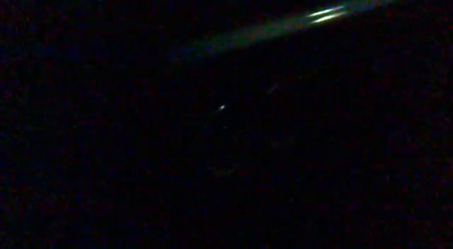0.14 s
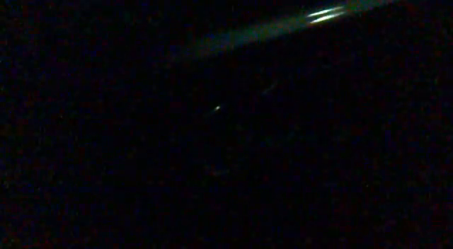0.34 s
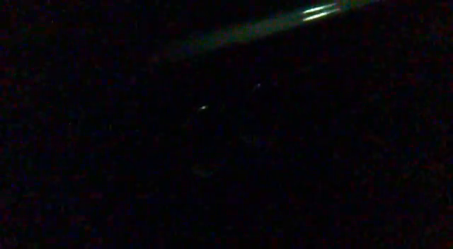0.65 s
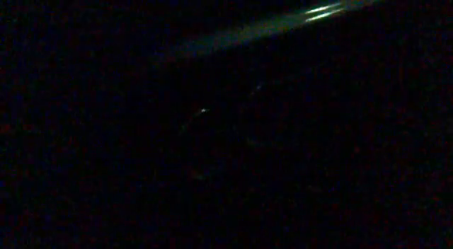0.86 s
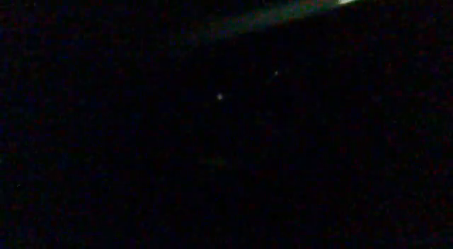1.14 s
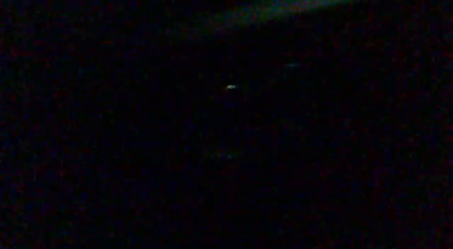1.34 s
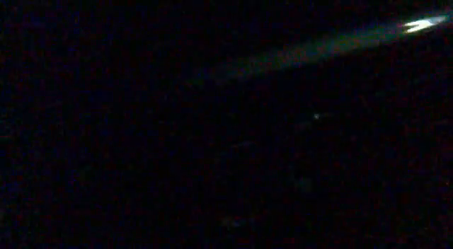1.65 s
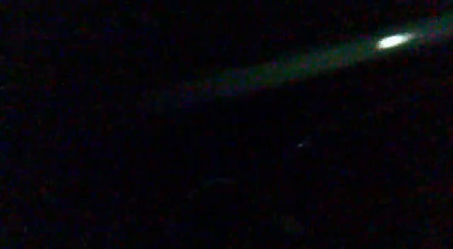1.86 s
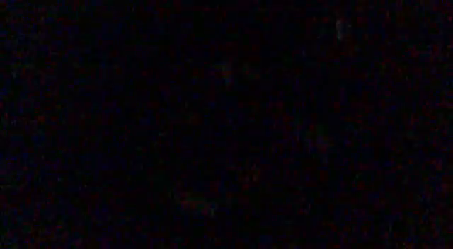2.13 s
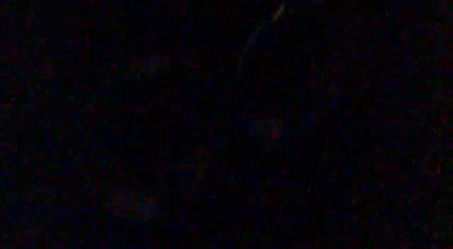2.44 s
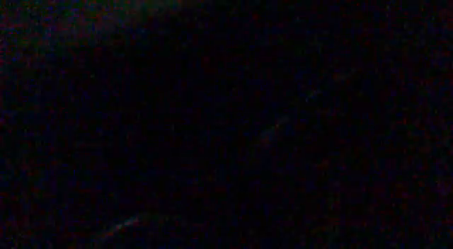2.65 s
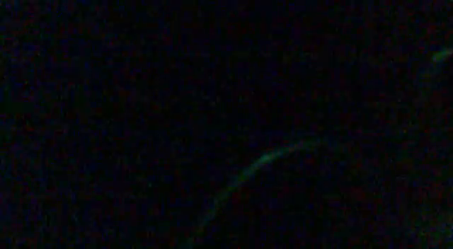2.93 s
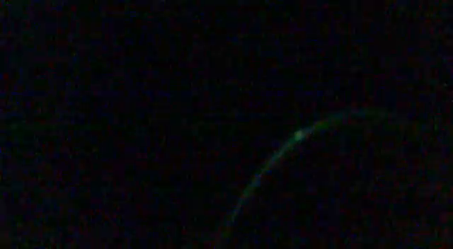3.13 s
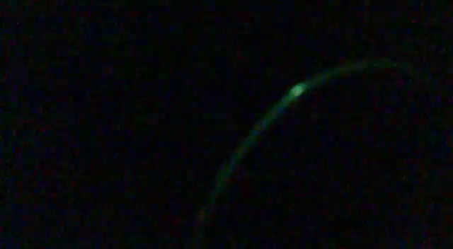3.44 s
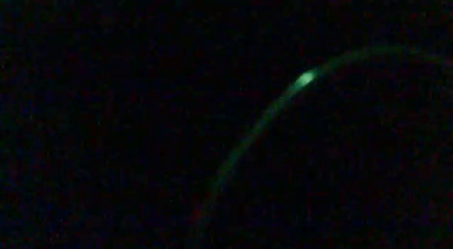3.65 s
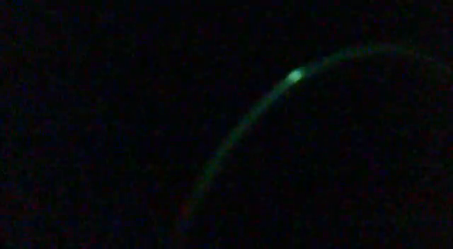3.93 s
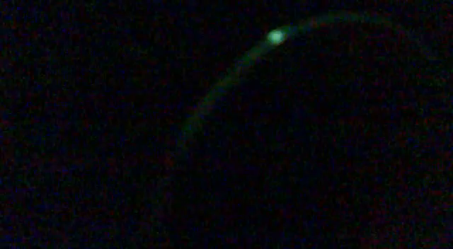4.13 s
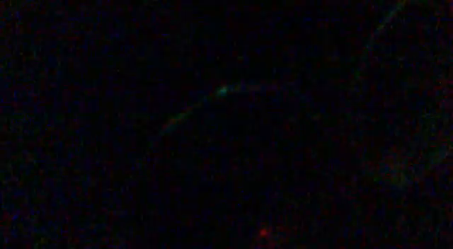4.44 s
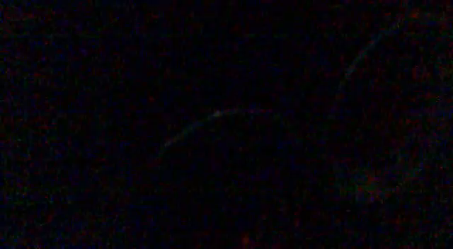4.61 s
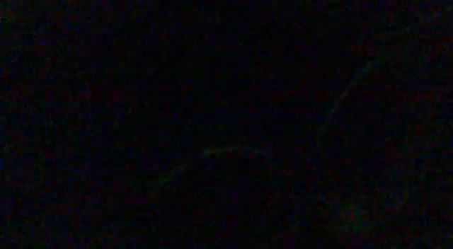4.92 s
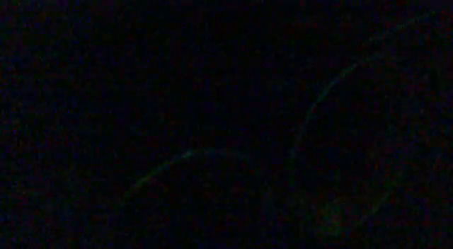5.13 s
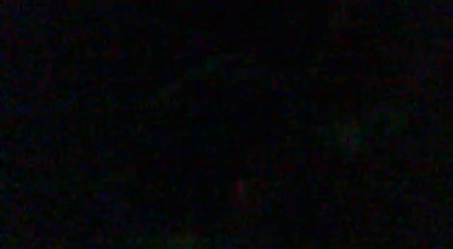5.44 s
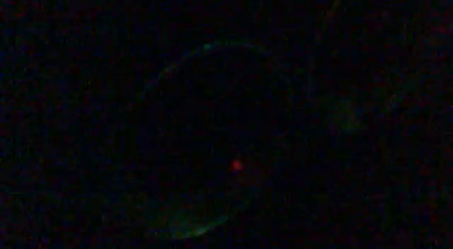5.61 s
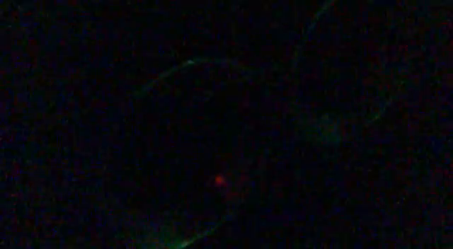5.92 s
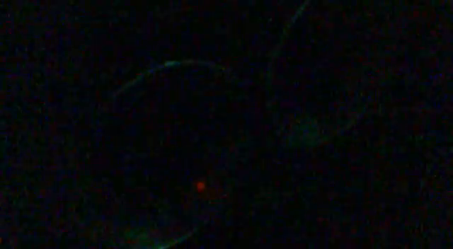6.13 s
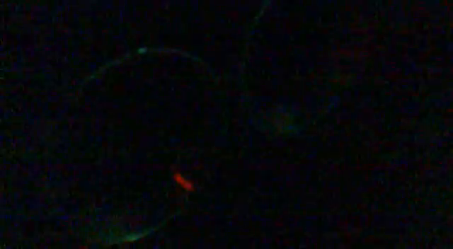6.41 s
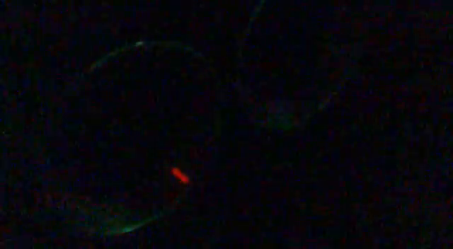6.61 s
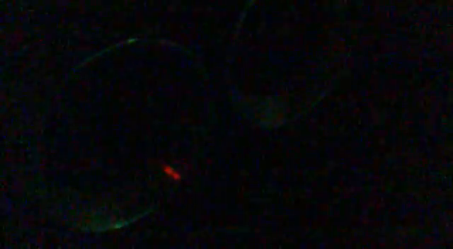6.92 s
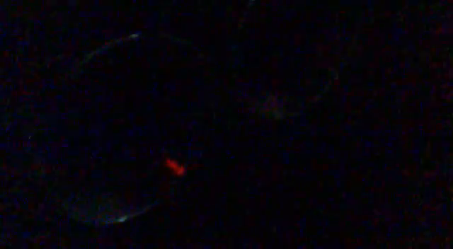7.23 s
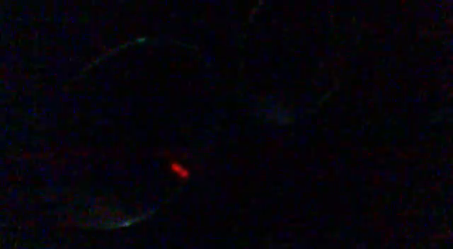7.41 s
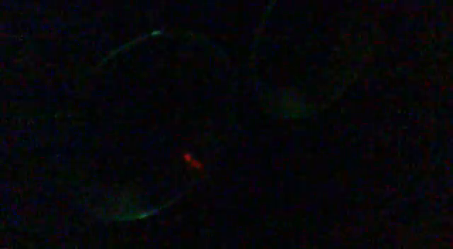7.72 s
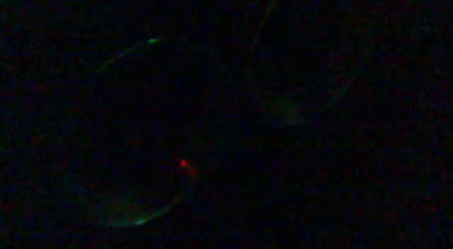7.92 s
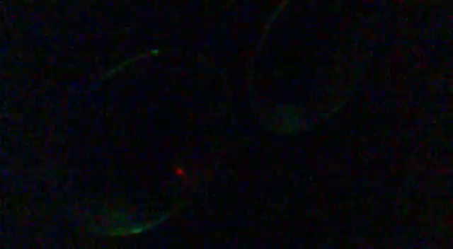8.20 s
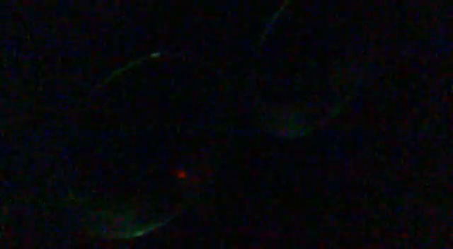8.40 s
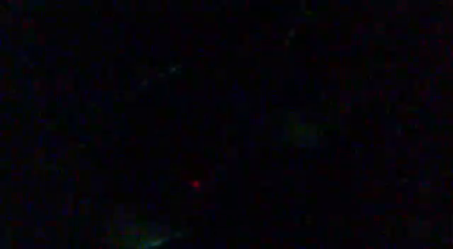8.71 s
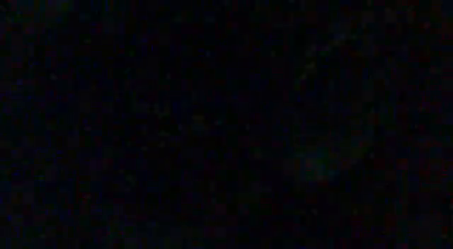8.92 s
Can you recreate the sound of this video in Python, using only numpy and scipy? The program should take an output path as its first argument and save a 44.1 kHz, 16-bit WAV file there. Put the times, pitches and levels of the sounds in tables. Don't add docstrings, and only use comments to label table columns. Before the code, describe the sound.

Low, throbbing exhaust idle heard up close outdoors, with airy hiss and a few sharp handling clicks, growing boomy and hollow before settling slower and quieter.

```python
import sys
import numpy as np
from scipy import signal
from scipy.fft import rfft, irfft
from scipy.io import wavfile
from scipy.ndimage import uniform_filter1d

SR = 44100
rng = np.random.default_rng(int(sys.argv[2]) if len(sys.argv) > 2 else 0)


def natural_amplitude(level_db):
    exponent = np.asarray(level_db, float) / 20
    return 10 ** exponent


def unload_audio(sound):
    columns = np.transpose(np.atleast_2d(sound))
    steps = np.round(np.clip(columns, -1, 1) * 32767)
    wavfile.write(sys.argv[1], SR, steps.astype(np.int16))


N = 399534


def rms_one(x):
    return x / np.sqrt(np.mean(x ** 2) + 1e-20)


def in_time(rows):
    s, *columns = np.transpose(rows)
    return [np.interp(np.arange(N) / SR, s, c) for c in columns]


def window(start_s, end_s, fade_s):
    t = np.arange(N) / SR
    return np.clip(np.minimum(t - start_s, end_s - t) / fade_s + .5, 0, 1)


def drift(rate):
    r = np.exp(-80 * np.pi * rate / SR)
    slow = signal.lfilter([1], [1, -2 * r, r * r], rng.standard_normal(N // 40 + 2002))[2000:]
    return np.interp(np.arange(N) / 40, np.arange(len(slow)), rms_one(slow))


def resonance(x, hz, width_hz):
    r = np.exp(-np.pi * width_hz / SR)
    feedback = [1, -2 * r * np.cos(2 * np.pi * hz / SR), r * r]
    return signal.lfilter(np.array([1, 0, -1]) * (1 - r * r) / 2, feedback, x)


def double_resonance(x, hz, width_hz):
    return resonance(resonance(x, hz, width_hz), hz, width_hz)


def tone(turns, db):
    return np.sqrt(2) * natural_amplitude(db) * np.cos(2 * np.pi * turns)


def noise(spectrum, patchy_db, beat_db=0):
    hz, db = np.transpose(spectrum)
    grid = np.maximum(np.arange(N // 2 + 1) * SR / N, 1)
    shape_db = np.interp(np.log(grid), np.log(hz), db, left=-90, right=-90)
    shaped = rfft(rng.standard_normal(N)) * natural_amplitude(shape_db)
    band = np.floor(2 * np.log2(grid / hz[0])).clip(0, int(2 * np.log2(hz[-1] / hz[0])))
    together = drift(3.6)
    out = np.zeros(N)
    for k in np.unique(band):
        flicker_db = patchy_db * (0.73 * together + drift(11)) + beat_db
        out += irfft(shaped * (band == k), N) * natural_amplitude(flicker_db)
    return rms_one(out)


def skirt_db(hz, peak_hz, width_hz):
    return -10 * np.log10(1 + ((hz - peak_hz) / width_hz) ** 2)


# time in seconds, firing rate in firings per second.
FIRING_RATE = [(0.0, 53.1), (0.2, 53.66), (0.6, 52.34), (1.0, 50.24), (1.4, 47.56), (1.8, 46.78),
               (2.4, 46.81), (3.0, 45.75), (4.4, 43.98), (4.6, 44.41), (5.0, 43.21), (5.2, 43.73),
               (5.4, 42.7), (6.0, 41.98), (7.6, 39.62), (9.06, 38.26)]
# time in seconds, firing tone (nearness) in dB,
# pipe ring (facing the mouth) in dB.
MIC_PATH = [(0, -24.5, -58), (.3, -21, -57), (.85, -19, -60), (1.3, -19, -58), (1.8, -18.5, -59),
            (2.1, -18, -42), (2.4, -14.5, -37), (2.8, -15, -35.5), (3.3, -10.5, -30.5), (4.0, -11, -31),
            (4.4, -12.5, -33), (5.0, -17.5, -40), (5.8, -17.5, -41), (6.4, -20, -42.5), (7.4, -20.5, -40),
            (8.4, -21, -43), (9.06, -22, -44)]


def firing_orders(turns, speed, first_db):
    second_db = first_db - 14.5 + skirt_db(2 * speed, 81.4, 5.1) + 1.6 * drift(1.1)
    fourth_db = first_db - 24.5 + skirt_db(4 * speed, 191.7, 11) + 1.1 * drift(2.4)
    load_db = 0.42 * drift(7.7)
    out = tone(turns, first_db + load_db)
    out += tone(2 * turns + .28, second_db) + tone(4 * turns - .42, fourth_db)
    out += tone(turns / 2 + .33, first_db - 36) + tone(1.5 * turns - .36, first_db - 36)
    out += tone(5.5 * turns, fourth_db - 9.5) + tone(6 * turns + .1, second_db - 15)
    out += tone(3 * turns, first_db - 34.5) + tone(5 * turns, fourth_db - 13)
    return out


# blow strength in dB, arrival against the firing tone in ms.
CYLINDERS = [(-4.9, -9.83), (-4.4, -12.0), (-3.1, -7.23), (-4.3, -8.18), (0.0, -7.28), (-1.0, -8.08)]


def exhaust_blows(turns):
    count = int(turns[-1])
    blow_db, lag_ms = np.array(CYLINDERS)[np.arange(count) % 6].T
    scatter = rng.standard_normal((count, 2))
    late_ms = lag_ms + .04 * scatter[:, 0]
    at = np.interp(np.arange(count), turns, np.arange(N)) + late_ms * SR / 1000
    blows = np.zeros(N)
    blows[np.clip(at.astype(int), 0, N - 1)] = natural_amplitude(blow_db + .7 * scatter[:, 1])
    return blows


# frequency in Hz, width in Hz, level in dB against a point 18.5 dB
SILENCER = [(28, 14, -42.5), (70, 30, -34), (135, 23, -32.5), (248.7, 17, -28), (340, 36, -32.5),
            (526, 110, -26.5)]


def engine():
    first_db, ring_db = in_time(MIC_PATH)
    speed, = in_time(FIRING_RATE)
    turns = np.cumsum(speed) / SR - .12
    orders = firing_orders(turns, speed, first_db)
    blows = exhaust_blows(turns)
    ring = double_resonance(blows, 302, 29)
    evened = ring / np.sqrt(uniform_filter1d(ring ** 2, size=SR // 3) + 1e-20)
    silencer = sum(natural_amplitude(db) * rms_one(double_resonance(blows, hz, w)) for hz, w, db in SILENCER)
    return orders + natural_amplitude(ring_db) * evened + natural_amplitude(first_db - 18.5) * silencer, turns


# time in seconds, openness in dB.
OPENNESS = [(0, 3.5), (.7, 4), (1.3, 2), (2.2, 0.5), (3.5, 0), (4.9, -4), (5.45, -2), (5.65, 1),
            (6.4, -1.5), (7.8, 0.5), (9.06, 0)]
# frequency in Hz, density in dB per Hz.
RUMBLE = [(20, -2.5), (35, -5.5), (60, -1.5), (110, -3.5), (160, -4), (230, -9), (330, -7.5), (400, -48.5),
          (520, -14.5)]
# frequency in Hz, density in dB per Hz.
RUSH = [(240, -31), (400, -1), (452, -0.5), (541, -2.5), (948, -4.5), (1080, -5), (1360, -7), (1460, -5.5),
        (1550, -6), (2800, -19.5), (3640, -27.5), (6160, -120)]
# frequency in Hz, density in dB per Hz.
SIZZLE = [(1350, -16), (2300, -1.5), (3830, -6.5), (4240, -8), (4890, -11), (9500, -22), (12400, -40),
          (20900, -120)]


def air(turns):
    open_db, = in_time(OPENNESS)
    beat = np.cos(2 * np.pi * turns)
    out = natural_amplitude(-39.5 + .3 * open_db) * noise(RUMBLE, patchy_db=0.1)
    out += natural_amplitude(-46.5 + .7 * open_db) * noise(RUSH, patchy_db=1.0, beat_db=0.34 * beat)
    out += natural_amplitude(-53.5 + open_db) * noise(SIZZLE, patchy_db=0.84, beat_db=0.63 * beat)
    return out


def engine_bay():
    level_db, until_s = -59.5, 1.55
    low = rms_one(double_resonance(rng.standard_normal(N), 7400, 1500))
    high = rms_one(double_resonance(rng.standard_normal(N), 10300, 3000))
    out = natural_amplitude(level_db - 1.5) * low * window(-1, until_s, 0.53)
    return out + natural_amplitude(level_db - 6) * high * window(-1, until_s, 0.46)


# frequency in Hz, width in Hz, level in dB,
# start in seconds, end in seconds.
DUCTS = [(535.4, 7, -47.5, -1, .82), (539, 56, -48.5, 3.0, 4.5), (545, 36, -53.5, 4, 10),
         (421, 13, -54, 0.9, 9), (856, 7.5, -55, 2.5, 3.1), (1117, 22, -56.5, 2, 3.4),
         (730, 13, -59, 4.5, 10), (1079.5, 15, -57, 5, 10), (1233, 15, -57, 6.5, 10),
         (1448, 60, -55.5, -1.5, 2.55), (1456, 9, -56, 2, 4.92), (1240, 180, -52, 0, 2.1),
         (784, 7.8, -57.5, 4.5, 5.65), (3430, 90, -61.5, -1, 1.34)]


def ducts():
    out = np.zeros(N)
    for hz, width_hz, db, start_s, end_s in DUCTS:
        singing = rms_one(resonance(rng.standard_normal(N), hz, width_hz))
        out += natural_amplitude(db + drift(1.6)) * window(start_s, end_s, 0.22) * singing
    return out


# multiple of the shaft rate, level against the hum in dB.
FAN_TONES = [(1, -8), (5, 1), (15, -23.5)]
# start in seconds, end in seconds, gain in dB.
FAN_FACED = [
    (.9, 1.3, 2.5),
    (6.5, 7.4, 4),
    (7.7, 8.4, 2.5),
]


def fan():
    turns = 27.92 * np.arange(N) / SR + 0.0066 * drift(1.9)
    faced_db = sum(db * window(start_s, end_s, 0.46) for start_s, end_s, db in FAN_FACED)
    hum_db = -43.5 + 0.36 * in_time(OPENNESS)[0] + faced_db
    out = tone(10 * turns, -46.5 - 8 * window(1.5, 2.7, .4) + .8 * drift(.8))
    for k, db in FAN_TONES:
        out += tone(k * turns, hum_db + db + 0.54 * drift(1.5))
    return out


# start in seconds, length in seconds, frequency in Hz, level in dB.
CHIRPS = [(1.443, 0.11, 4050, -60), (1.95, 0.17, 4020, -71), (2.3, .25, 3500, -65), (4.25, 0.21, 3520, -67),
          (2.196, 0.26, 4030, -66), (2.288, 0.034, 6570, -67), (2.345, .03, 6570, -65),
          (2.52, .07, 6130, -77), (2.675, 0.06, 6110, -69), (2.827, .23, 6130, -76),
          (4.205, 0.061, 6555, -66), (4.277, 0.052, 6555, -66)]


def insects():
    band = double_resonance(rng.standard_normal(N), 4155, 75)
    band += .4 * natural_amplitude(3 * drift(2.5)) * double_resonance(rng.standard_normal(N), 4320, 90)
    chorus_db = -65.5 + .3 * in_time(OPENNESS)[0] + .8 * drift(1.3) + 1.1 * drift(16)
    out = natural_amplitude(chorus_db) * rms_one(band)
    t = np.arange(N) / SR
    for start_s, length_s, hz, db in CHIRPS:
        chirp = tone(hz * t + .06 * drift(40), db + 2.2 * drift(30)) + tone(2 * hz * t, db - 16)
        out += window(start_s, start_s + length_s, .008) * chirp
    return out


# start in seconds, end in seconds, first pitch in Hz, last pitch in Hz, level in dB.
TRAFFIC = [
    (.35, 1.5, 111, 110.4, -44),
    (1.5, 2.5, 221.6, 222, -51),
    (2.1, 3.4, 82, 84.8, -47),
    (5.21, 6.3, 89.52, 91.16, -38.5),
    (7.1, 7.645, 65, 64.6, -47),
    (7.654, 9.3, 66.8, 67.1, -42.5),
]
# levels of multiples 1, 2, 3 and 4 in dB.
TRAFFIC_VOICES = [(0, -10.5, -34, -33), (0, -40, -40, -40), (0, -8.5, -35, -34), (0, -4, -40, -40),
                  (0, -6, 2.5, -1), (0, 3, -7, -5.5)]


def traffic():
    out = np.zeros(N)
    for (start_s, end_s, first_hz, last_hz, db), voice in zip(TRAFFIC, TRAFFIC_VOICES):
        hz, = in_time([(start_s, first_hz), (end_s, last_hz)])
        turns = np.cumsum(hz) / SR + 0.014 * drift(4.0)
        stack = np.zeros(N)
        for k, share_db in enumerate(voice, 1):
            stack += tone(k * turns, db + share_db + 1.9 * drift(1.1))
        out += stack * window(start_s, end_s, 0.15)
    return out


def belt_whine(turns):
    from_s, to_s, sag_db_per_s = .62, 1.58, 8
    whine_db = -50 - sag_db_per_s * (np.arange(N) / SR - from_s)
    return tone(17.9 * turns + 0.34 * drift(3.6), whine_db) * window(from_s, to_s, 0.23)


# start in seconds, peak level in dB, ring in Hz, time for the decay to fall 120
# dB in ms.
TICKS = [(1.5436, -28, 3300, 1.3), (1.5455, -27, 3000, 2.4), (1.5612, -29, 7500, 1.0),
         (1.5637, -12, 3200, 1.9), (1.5639, -31, 10500, 1.0), (1.5645, -22, 3000, 3.0),
         (1.5678, -16, 5400, 1.4), (1.5677, -23, 1900, 3.0), (1.5679, -35, 12500, 1.0),
         (1.7853, -36, 9000, .5), (1.7878, -41, 9500, .9), (2.0797, -31, 2300, 2.2),
         (2.1083, -13, 1400, 2.5), (2.1096, -23, 2000, 2.2), (2.1101, -27, 800, 7.0)]
# start in seconds, length in seconds, frequency in Hz, level in dB.
RUBS = [
    (1.549, 0.022, 5050, -43.5),
    (1.561, 0.0035, 4220, -34),
    (2.047, .055, 3470, -55),
    (5.577, .05, 8000, -67),
]


def handling():
    out, t = np.zeros(N), np.arange(SR // 50) / SR
    for start_s, db, hz, fall_ms in TICKS:
        ring = -np.sin(2 * np.pi * hz * t) * natural_amplitude(-120000 * t / fall_ms) * (t * hz) ** 2
        i = round(start_s * SR)
        out[i:i + len(t)] += natural_amplitude(db) * ring / np.abs(ring).max()
    grit = rng.standard_normal(N) * rng.exponential(1, N)
    for start_s, length_s, hz, db in RUBS:
        rub = rms_one(double_resonance(grit, hz, hz))
        out += natural_amplitude(db) * window(start_s, start_s + length_s, 0.007) * rub
    return signal.sosfilt(signal.butter(2, 450, "high", fs=SR, output="sos"), out)


def scene():
    exhaust, turns = engine()
    gas = air(turns) + engine_bay() + ducts()
    surroundings = fan() + insects() + traffic()
    return (exhaust + gas + surroundings + belt_whine(turns) + handling())[None]


# frequency in Hz, density in dB per Hz.
SELF_NOISE = [(5000, -15), (8000, -16.5), (10000, 0), (13000, 2.5), (16000, 6)]


def preamp_hiss(dry):
    level_db = 10 * np.log10(uniform_filter1d(dry[0] ** 2, size=SR // 2) + 1e-12)
    return natural_amplitude(-66.5 - .15 * (level_db + 20)) * noise(SELF_NOISE, patchy_db=.15)


def top_cut(x):
    return signal.sosfilt(signal.butter(12, 17020, fs=SR, output="sos"), x)


def record(dry):
    top = signal.ellip(12, .5, 80, 15650, fs=SR, output="sos")
    mix = signal.sosfilt(top, dry + preamp_hiss(dry))
    return top_cut(mix)


dry = scene()
out = record(dry)
unload_audio(out)
```